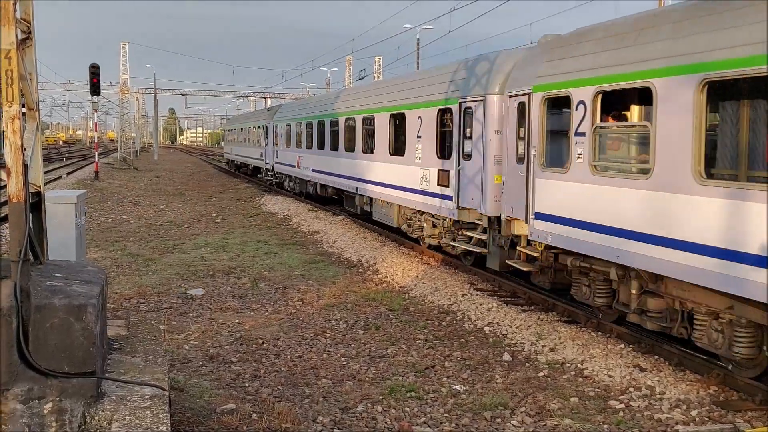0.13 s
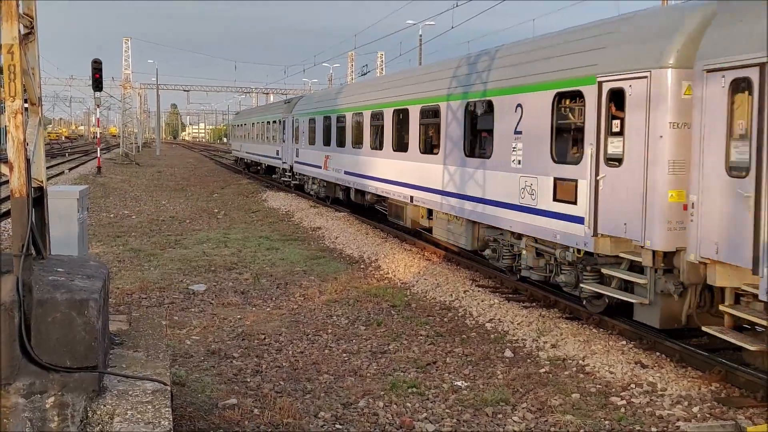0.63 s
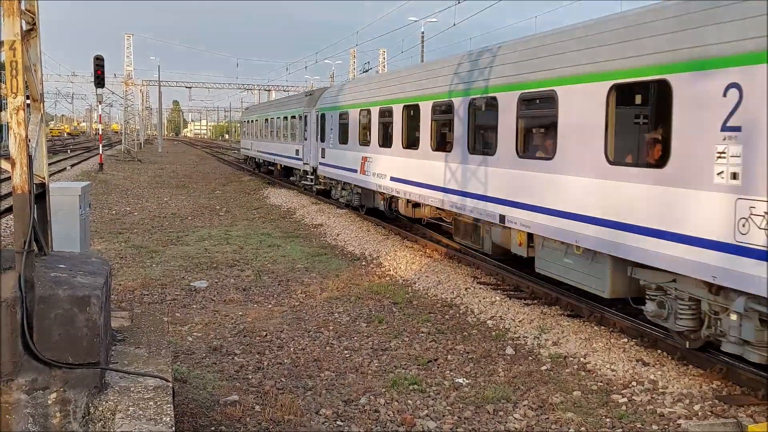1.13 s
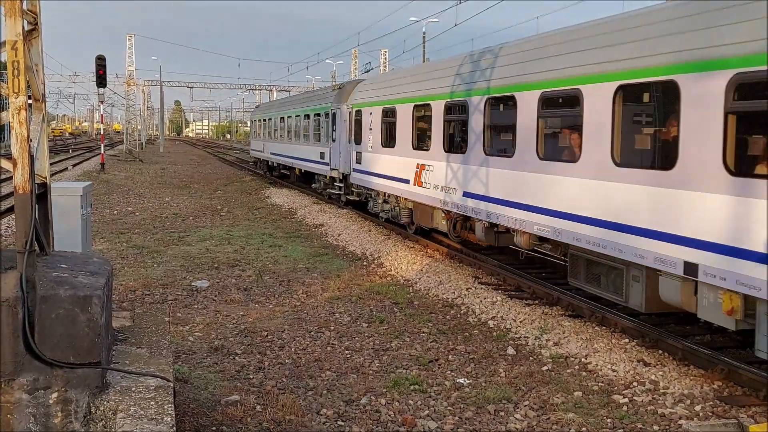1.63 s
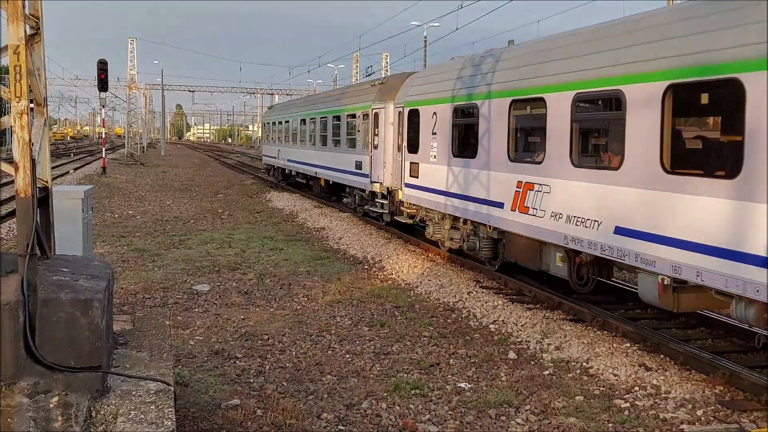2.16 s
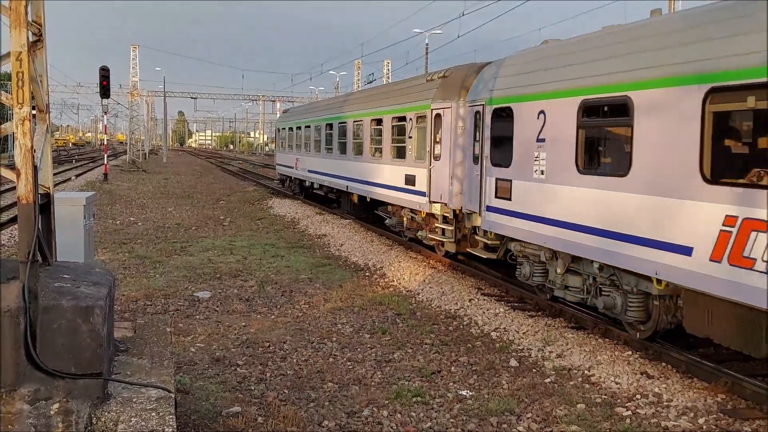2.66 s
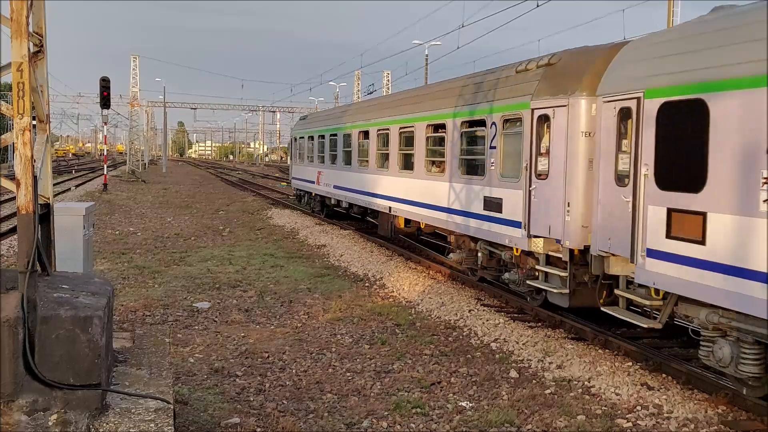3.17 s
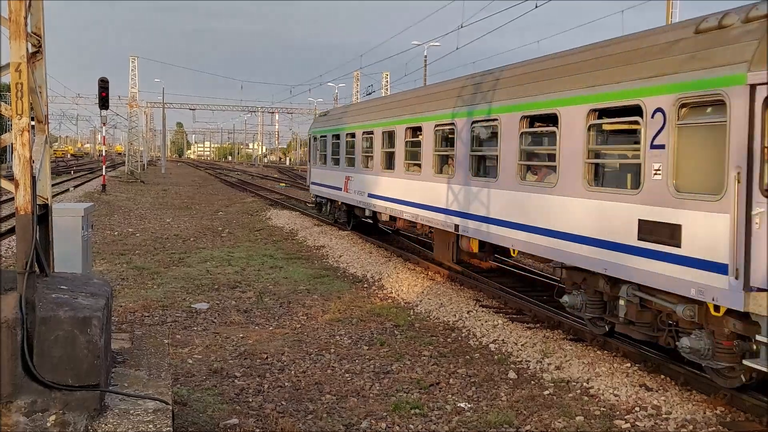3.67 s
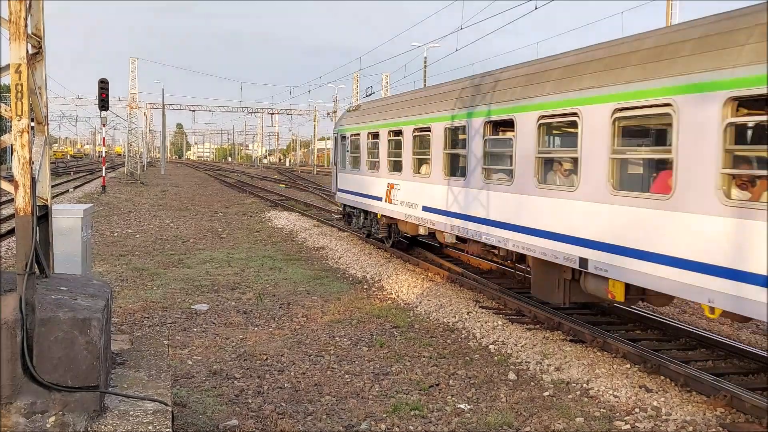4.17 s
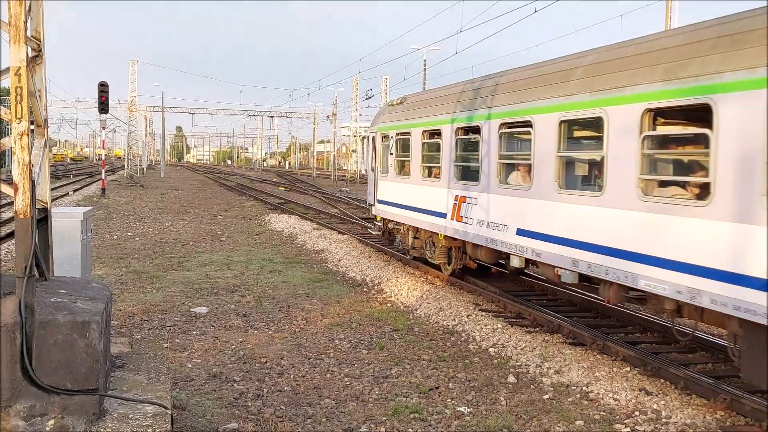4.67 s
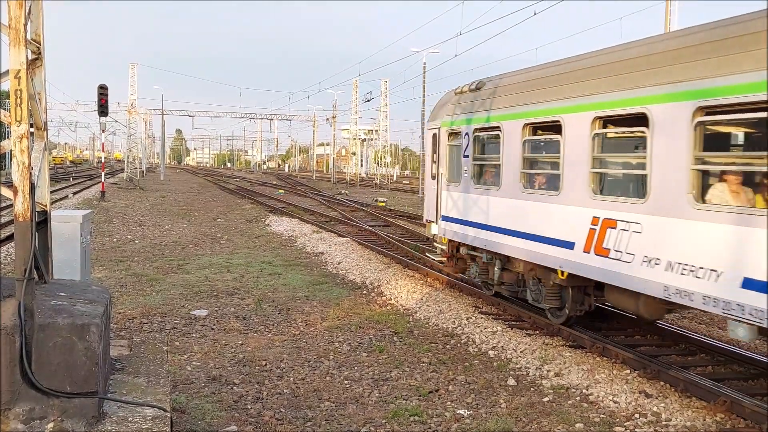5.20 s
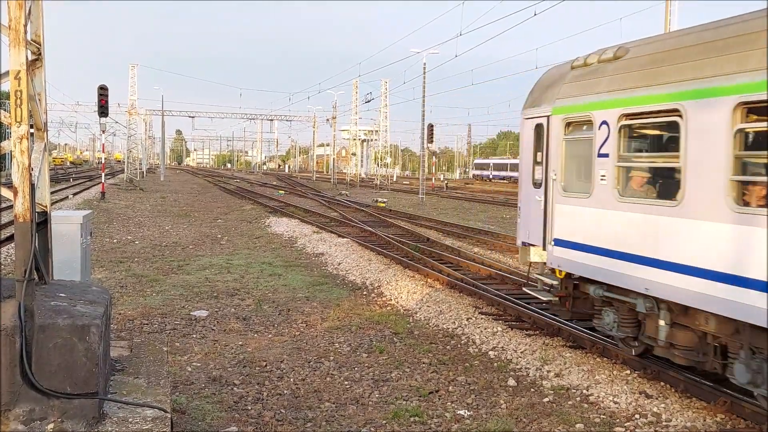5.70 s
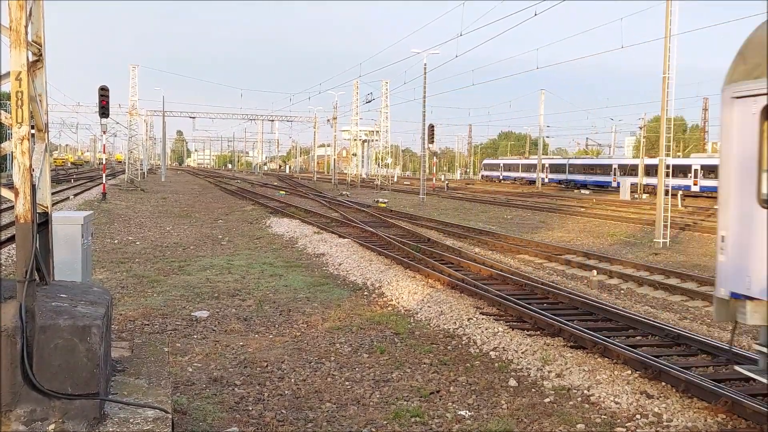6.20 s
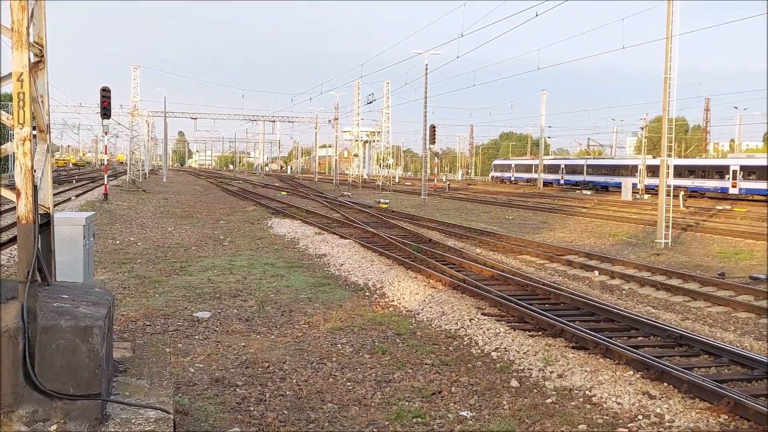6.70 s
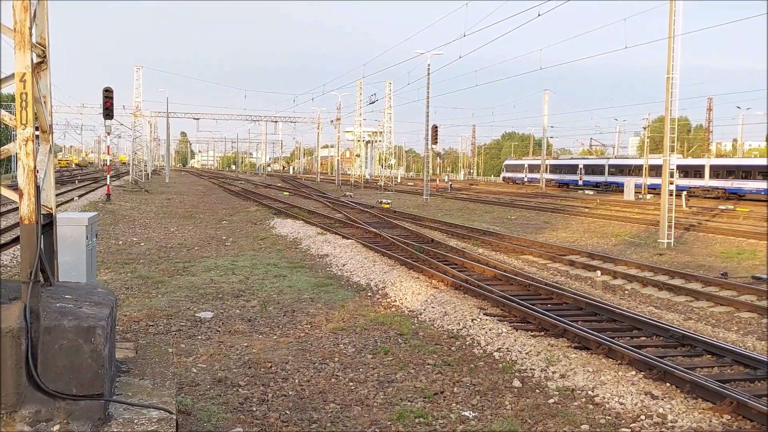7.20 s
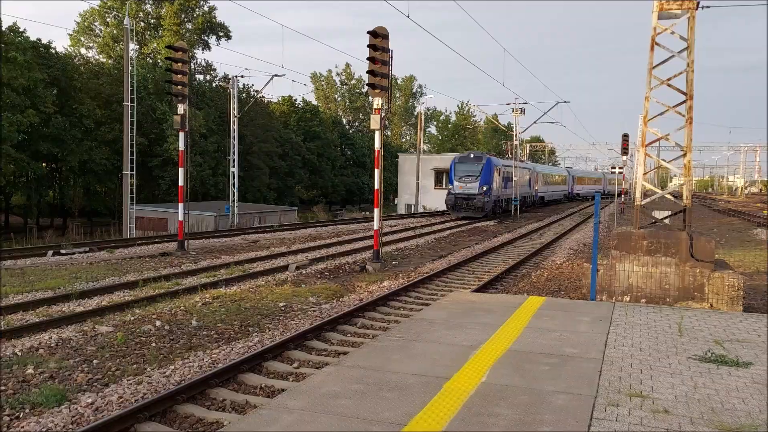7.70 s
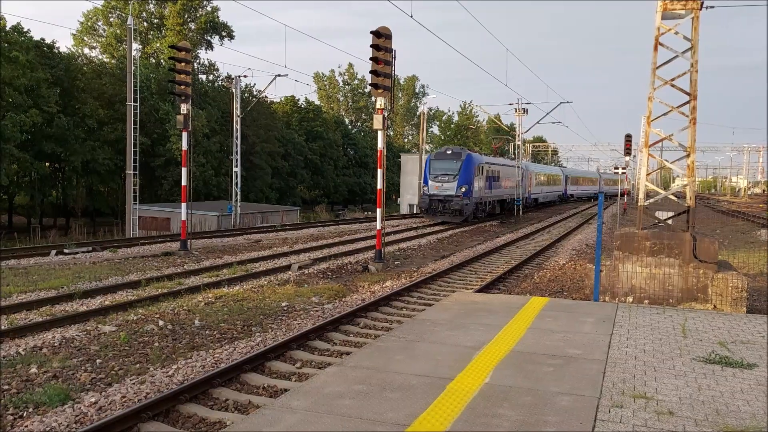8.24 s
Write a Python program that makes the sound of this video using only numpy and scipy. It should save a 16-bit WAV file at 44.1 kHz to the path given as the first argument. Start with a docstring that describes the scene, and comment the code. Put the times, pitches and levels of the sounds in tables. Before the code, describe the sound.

A close stereo pickup beside the rails catches the end of a passing train: steady rolling rumble, hiss and steel scraping, broken by irregular groups of heavy thuds and noisy clanks. A short crackle of brake air and a very high faint whine pass by. The final wheels knock past, the clatter recedes, and sound cuts out briefly. Then comes a quiet open yard with far train noise, low wind puffs and a soft double bump.

```python
"""Beside a jointed railway, then a quieter yard: a passenger train rolls past close by on the right.
Shaped noise makes the rumble, rail roar, hiss and scrape; decaying sines ring the wheels and rail ends.
Blows of axles over joints and loose rattles mix a low thud and a noisy clank; short tones knock, groan and squeak.
One spit of brake air crackles, and a thin wavering sine whines from under a coach.
After a short silence comes far train noise, with low wind puffs mostly on the left microphone port."""
import sys
import numpy as np
from scipy import signal
from scipy.fft import rfft, irfft
from scipy.io import wavfile
from scipy.ndimage import uniform_filter1d

SR = 44100
rng = np.random.default_rng(int(sys.argv[2]) if len(sys.argv) > 2 else 0)


def field_ratio(decibels):
    """Amplitude ratio for a level in dB (20 dB per decade); scalars and array-likes work."""
    return 10 ** (np.asarray(decibels, dtype=float) / 20)


def unload_wav(signal):
    """Save mono or channel-first audio to the path in sys.argv[1] as 16-bit WAV at rate SR, clipped to [-1, 1]."""
    wavfile.write(
        sys.argv[1],
        SR,
        np.round(np.clip(np.atleast_2d(signal).T, -1, 1) * 32767).astype(np.int16),
    )


N = 368216  # length in samples

# Rolling layers, rumble to fizz: low_hz, high_hz
ROLL_BANDS = [(40, 150), (150, 450), (450, 1100), (1100, 2500), (2500, 10000), (10000, 16000)]
# Spectral shape of rolling noise and clanks: pitch_hz, density_db
ROLL_COLOUR = [(19, -33.5), (32, -8), (65, 0.5), (299, -4), (388, -9.5), (504, -10.5), (1160, -17.5),
               (1390, -19.5), (2050, -22.5), (2500, -25.5), (3450, -26), (6300, -35.5), (7530, -32),
               (8570, -34), (13300, -42), (16000, -51)]
# Broad rail and microphone resonances: pitch_hz, width_hz, lift_db
RESONANCES = [(274, 46, 1.5), (710, 76, 1.5), (1340, 49, 7), (1900, 115, 1.5), (3450, 330, 3),
              (7330, 310, 1.5)]
# How each rolling layer follows the controls: level_db, nearness_share, boom_share, drumming_db
LAYERS = [(-39, 0.29, -0.13, 3.5), (-33.5, 0.27, 0.69, -1.5), (-40, 0.67, 0.63, 1.05),
          (-41, 0.33, 0.078, 1), (-46, 0.86, 0.45, 0.85), (-66, 1, 0.56, 0)]
# Nearness of the running gear: time_s, nearness_db (read relative to NEAR_MEAN_DB)
NEARNESS = [(0.0, -55), (0.16, -50), (0.41, -40), (0.53, -43.5), (0.73, -46), (0.92, -42.5), (1.28, -41.5),
            (2.02, -46.5), (2.12, -44), (2.41, -49), (2.7, -48.5), (2.9, -49), (3.23, -40), (4.0, -42),
            (4.39, -43), (5.22, -49.5), (5.41, -51), (5.68, -48.5), (5.78, -42), (5.92, -42), (6.08, -37),
            (6.35, -43), (6.82, -50), (6.96, -55.5), (7.33, -55)]
NEAR_MEAN_DB = -46
# Bogies running up to the nearest joint, booming loose sleepers: time_s, boom_db
BOGIES = [(.1, 6), (.68, 7.5), (1.46, 5), (1.95, 4.5), (3.15, 5), (3.42, 5), (4.15, 5), (4.6, 0.5),
          (6.09, 2.5), (6.42, 0), (6.8, 0.5), (7.45, -2.5)]
BOOM_RISE_S, BOOM_FALL_S = 0.27, 0.06
# One coach passes in COACH_S; its floor drums when the middle is abreast
COACH_S, COACH_MIDDLE_S = 2.67, 2.89
# Air leaking under a coach: time_s, lift_db over the fizz, half_length_s
LEAK = (5.42, 7.9, 0.56)
# Likeness of the two microphone ports for the near train: pitch_hz, likeness (0 to 1)
TRAIN_LIKENESS = [(40, 0.45), (80, 0.59), (150, 1), (300, 0.91), (700, 0.95), (1400, 0.37), (3000, 0.031),
                  (8000, 0.12), (14000, 0.12)]
# Sensitivity of the ports: pitch_hz, left_minus_right_db
PORT_TILT = [(60, -1.5), (180, 0.5), (550, 1), (1650, 2), (4970, 1.0), (15000, 0.5)]
LEFT_LEAD_S = -2.75e-4  # negative: the train is on the right, so the left port hears it late
# Ringing modes of a wheel: pitch_hz, level_db, t60_s
WHEEL_MODES = [(2145, -20, 0.072), (3400, -17, 0.12), (3740, -28.5, 0.064), (3950, -20, 0.1),
               (6642, -31, 0.12), (7706, -29, 0.18), (9060, -32, 0.13), (9688, -29.5, 0.16)]
# Rail-end ring after the thud: pitch_hz, level_db against the thud, t60_s
RAIL_END = [(299, -14, 0.29), (407, -7.5, 0.058), (716, -13.5, 0.016)]
# Bands where tread and rail scrape: pitch_hz, width_hz, level_db, nearness_share, burst_db
SCRAPES = [(354, 150, -43.5, 0.99, 2.5), (624, 340, -45.5, 0.5, 2.5), (1490, 70, -50, 0.77, 3.5),
           (2025, 140, -49.5, 0.15, 2.5), (3430, 270, -56, 1.6, 3), (3940, 620, -59.5, 1.5, 5),
           (7170, 320, -64.5, 0.69, 6), (7860, 250, -68.5, 0.98, 6)]
# Blows of the passing train (axles over joints, loose rattles with hardly a thud, a treble swell at 6.805 s):
# time_s, clank_db, thud_db (both before trim), dullness_db (far: more knock, less fizz)
BLOWS = [(0.1192, -30, -30, 3), (0.227, -29, -35, 5), (0.4, -25.5, -37, 5), (0.5296, -26, -32, -1.5),
         (0.624, -43, -10, -1.5), (0.6519, -22.5, -6.5, -5.5), (0.9306, -22.5, -9, -1),
         (1.183, -30.5, -25, -1), (1.3586, -31, -21, -5), (1.4716, -24.5, -6.5, -4.5),
         (1.751, -22.5, -11, 0.7), (2.036, -23, -30, 6), (2.3306, -28.5, -30, 6), (2.867, -25.5, -22, 5),
         (2.9785, -30.5, -44, 0.5), (3.0919, -25, -42, 2.5), (3.373, -45, -9, 12.5),
         (3.406, -29, -7.5, -1.5), (3.6886, -26, -7.5, -2.5), (3.815, -29, -61.5, -3),
         (4.1007, -27.5, -21, 2.5), (4.2281, -25.5, -5.5, -3.5), (4.51, -23.5, -8.5, -2),
         (4.577, -26, -28, -2.5), (4.796, -22, -17, 5), (5.089, -29, -25, 3.5), (5.7439, -29, -49, -6.5),
         (6.018, -36, -26, 1), (6.152, -42, -13, 12), (6.171, -24.5, -7, -1), (6.4545, -23, -8.5, -2),
         (6.805, -41.5, -38, -5), (7.148, -38, -50, 0), (7.239, -40, -47, 0), (7.4203, -37, -27, 4.5)]
THUD_HZ = 361  # before each blow's random detune
THUD_LEAD_S, THUD_RISE_S, THUD_FALL_S = .0005, .0042, .002  # swells, then stops short
CLANK_T60_S = 0.3  # before the shortening with pitch
KNOCK_SHARE, FIZZ_SHARE = 0.9, 0.65  # how far dullness lifts the knock and lowers the fizz
CLANK_RISE_S, SOFTEN_PER_DB = 0.0049, 0.23  # duller, farther clanks rise more slowly
CRACK, CRACK_S = 0.45, 0.0074  # extra strength of a clank's first instant, and how fast it goes
# Low groans of track and underframe, and short low wind gusts at 7.11 and 8.19 s:
# time_s, peak_db, pitch_hz, half_length_s
GROANS_AND_GUSTS = [(.12, -14, 186, 0.0053), (0.357, -26, 706, 0.014), (.41, -18.5, 190, 0.017),
                    (.7, -20.5, 163, 0.0087), (2.088, -28, 90, 0.022), (2.35, -24.5, 198, 0.026),
                    (3.11, -30, 612, 0.027), (3.16, -19, 198, 0.012), (4.805, -31, 700, 0.022),
                    (5.1, -19.5, 188, 0.0079), (5.783, -21, 119, 0.0093), (5.92, -28, 820, 0.027),
                    (7.11, -29, 74.6, 0.037), (8.19, -27, 67.6, 0.019)]
# Tread striking the far rail end: time_s, level_db before trim, pitch_hz
KNOCKS = [(0.524, -26, 781), (0.929, -22, 596), (1.75, -28, 530), (2.039, -21, 785), (2.332, -25, 600),
          (2.871, -18, 565), (3.15, -22, 775), (3.687, -24, 598), (4.508, -26, 608), (4.795, -21, 716),
          (5.091, -23, 720), (5.923, -19, 830), (6.452, -22, 500), (7.226, -28, 538), (7.429, -38, 726)]
KNOCK_PEAK_S, KNOCK_RISE_S, KNOCK_FALL_S = .0021, 0.00079, 0.0033
# Short squeaks, and a faint very high puff at 5.39 s: time_s, pitch_hz, level_db, length_s
SQUEAKS = [(0.673, 7900, -53, .03), (5.378, 7800, -48, 0.1), (5.4, 2540, -50, 0.056),
           (0.949, 3480, -38, 0.022), (1.05, 3930, -38, 0.018), (2.089, 1340, -35, 0.035),
           (3.713, 3450, -33.5, 0.02), (5.355, 2500, -44, .025), (1.777, 3450, -42, .02),
           (3.065, 2230, -45, 0.023), (6.308, 1400, -39, 0.017), (6.457, 3430, -31, 0.018),
           (6.519, 3600, -48.5, .08), (6.72, 1550, -48, .06), (6.71, 4650, -50, .03),
           (7.149, 4500, -45, 0.01), (7.153, 3970, -47.5, 0.022), (5.39, 15100, -51, .06),
           (7.838, 7600, -54, .015), (7.965, 7640, -55, .015), (8.075, 7700, -57, 0.02),
           (8.288, 2400, -53, 0.026), (8.299, 4760, -56, .015)]
# Whine as its coach passes: time_s, level_db before the waver
WHINE = [(1.501, -74), (2.2, -66), (2.7, -55), (3.3, -63), (3.5, -70), (3.749, -67), (4.3, -72),
         (5.401, -75), (5.6, -84)]
WHINE_HZ, WHINE_ABREAST_S, WHINE_M, SPEED_M_S = 13540, 3.75, 5, 8.8
SOUND_M_S = 343
# Puffs of brake air: start_s, level_db, length_s
SPITS = [(2.514, -56, .002), (2.523, -40, 0.0035), (2.543, -30.5, 0.017), (2.615, -47, 0.0067)]
# Spectral shape of brake air: pitch_hz, density_db
SPIT_COLOUR = [(1760, -34.5), (3000, -30.5), (3700, -14), (4260, -14.5), (8580, -12.5), (12700, -4),
               (14400, -2), (16000, -33.5)]
# Gap between the two scenes: start_s, end_s
SILENCE = (7.516, 7.700)
CUT_OUT_S, CUT_IN_S = 0.001, 0.00036
# Spectral shape of the yard before its bass and treble trim: pitch_hz, density_db
YARD_COLOUR = [(15, -62), (25, -22.5), (74, -3.5), (175, -24.5), (309, -13.5), (463, -33), (695, -22.5),
               (1100, -35.5), (2350, -32), (3800, -37.5), (5500, -47.5), (7500, -43), (8590, -51.5),
               (16000, -66)]
# Likeness of the ports in the yard: pitch_hz, likeness (-1 to 1)
YARD_LIKENESS = [(60, 0.24), (240, 1), (950, 0.44), (3770, -0.23), (15000, -0.032)]
# Wind puffs: time_s, level_db, left_minus_right_db
WIND = [(7.7, -23.5, 8), (7.726, -29, 10), (7.935, -31.5, 16.5), (7.96, -39.5, 1), (8.15, -61, -19),
        (8.18, -31.5, 0), (8.23, -59, 8), (8.3, -40, 1), (8.35, -47, -2)]
# Spectral shape of the wind: pitch_hz, density_db
WIND_COLOUR = [(25, -19), (60, 6.5), (150, -0.5), (300, -8.5), (500, -21.5), (900, -35), (2000, -92)]
# Double knock at the left port: start_s, level_db before trim, pitch_hz
BUMPS = [(7.794, -16.5, 342), (7.801, -22, 348)]


def evened(x):
    """Scales a signal to unit rms."""
    return x / np.sqrt(np.mean(x ** 2) + 1e-20)


def read(points, hz):
    """Reads a pitch_hz, value table on a log-frequency axis."""
    f, value = np.transpose(points)
    return np.interp(np.log(hz + 1), np.log(f + 1), value)


def add(mix, s, sound):
    """Mixes a sound in at s seconds."""
    part = mix[..., round(s * SR):][..., :sound.shape[-1]]
    part += sound[..., :part.shape[-1]]


def bins_and_times(size, count=N):
    """Bin frequencies and frame times of a spectrogram."""
    return np.fft.rfftfreq(size, 1 / SR), np.arange(count * 4 // size + 5) * size / 4 / SR


def patches(shape, bins, frames):
    """Random blotches over frequency and time, unit rms."""
    field = rng.standard_normal(shape[::-1]).T
    return evened(uniform_filter1d(uniform_filter1d(field, bins, 0), frames, 1))


def lead(hz):
    """Phase lead of the left port."""
    return 2 * np.pi * hz * LEFT_LEAD_S


def pair(db, likeness, phase_lead, size):
    """Two-port noise from a bins x frames dB field; the right port shares part of the left's noise."""
    a, b, c, d = rng.standard_normal((db.shape[1], db.shape[0], 4)).T
    likeness = np.clip(likeness, -1, 1)[:, None]
    left = a + 1j * b
    shared = likeness * left * np.exp(-1j * phase_lead)[:, None]
    right = shared + np.sqrt(1 - likeness ** 2) * (c + 1j * d)
    return signal.istft(np.array([left, right]) * field_ratio(db), nperseg=size, noverlap=size * 3 // 4)[1]


def tilted(x):
    """The ports differ a little in sensitivity across the spectrum."""
    half = read(PORT_TILT, np.fft.rfftfreq(x.shape[1], 1 / SR)) / 2
    return irfft(rfft(x) * field_ratio(np.array([half, -half])), x.shape[1])


def resonance_db(hz):
    """Lift of the spectrum by the rail and microphone resonances."""
    return sum(db / (1 + (2 * (hz - f) / width) ** 2) for f, width, db in RESONANCES)


def nearness_db(t):
    """Nearness of the running gear relative to its mean."""
    return np.interp(t, *np.transpose(NEARNESS)) - NEAR_MEAN_DB


def boom_db(t):
    """Each bogie swells slowly up to the joint and lets go quickly."""
    return sum(db * np.exp(-((t - s) / np.where(t < s, BOOM_RISE_S, BOOM_FALL_S)) ** 2) for s, db in BOGIES)


def layer_db(t):
    """Level of each rolling layer (rumble, sleepers, rail, roar, hiss, fizz) at times t."""
    near, boom = nearness_db(t), boom_db(t)
    drum = np.cos(2 * np.pi * (t - COACH_MIDDLE_S) / COACH_S)
    levels = np.array([db + a * near + b * boom + c * drum for db, a, b, c in LAYERS])
    leak_s, leak_db, half_s = LEAK
    levels[-1] += leak_db * np.exp(-((t - leak_s) / half_s) ** 2)
    return levels


def layer_gain(index):
    """Gain of one rolling layer at every sample."""
    t = bins_and_times(1024)[1]
    return np.interp(np.arange(N) / SR, t, field_ratio(layer_db(t)[index]))


def rolling(patchy_db=1.5, judder_db=0.83, drone_db=0.5, lump_db=1.5):
    """Rough wheels on rough rail: noise through the resonances, each band swelling as bogies pass."""
    hz, t = bins_and_times(1024)
    resonance = resonance_db(hz)
    colour = read(ROLL_COLOUR, hz) + resonance
    levels = layer_db(t)
    # bring every band to the level of its layer, then cross-fade between band centres
    offset = [level - 10 * np.log10(np.sum(field_ratio(2 * colour[(hz >= lo) & (hz < hi)])))
              for level, (lo, hi) in zip(levels, ROLL_BANDS)]
    centres = [np.sqrt(lo * hi) for lo, hi in ROLL_BANDS]
    share = np.array([read(list(zip(centres, row)), hz) for row in np.eye(len(centres))])
    db = colour[:, None] + share.T @ np.array(offset)
    patchiness = read([(300, 0.71), (5000, 1.0), (15000, 2.3)], hz)[:, None]
    db += patchy_db * patches(db.shape, 12, 8) * patchiness
    # narrow rail resonances come and go as wheels move along
    db += drone_db * patches(db.shape, 3, 20)
    # rolling surges in the sleepers
    lumpiness = read([(120, 0.17), (250, 0.88), (800, 0.92), (1500, 0.3)], hz)[:, None]
    db += lump_db * patches(db.shape, 6, 14) * lumpiness
    # resonances flare with the hiss layer, when a bogie is near
    db += np.outer(resonance, 0.085 * (levels[4] + 36.5))
    # loose parts shake wide bands together
    db += judder_db * patches(db.shape, 300, 3)
    return field_ratio(3.5) * pair(db, read(TRAIN_LIKENESS, hz), lead(hz), size=1024)[:, :N]


def ring(strikes, count):
    """Strikes ring the wheel modes; each mode takes its own random share of every strike."""
    t = np.arange(count) / SR
    out = np.zeros((2, len(strikes)))
    for hz, db, t60 in WHEEL_MODES:
        tone = field_ratio(db - 60 * t / t60) * np.sin(2 * np.pi * hz * t) * np.minimum(t / 0.0033, 1)
        rough = strikes * rng.standard_normal(out.shape)
        out += signal.oaconvolve(rough, tone[None], axes=1)[:, :len(strikes)]
    return out


def singing(ring_db=-13, nicks_per_s=120):
    """Small nicks in the rail ring the wheels, standing out while a bogie is near."""
    strength = field_ratio(4.3 * np.minimum(rng.exponential(1, N), 3))
    nicks = (rng.random(N) < nicks_per_s / SR) * strength
    near = layer_gain(index=4)  # follows the hiss
    return evened(ring(nicks, count=SR // 4)) * near * evened(near) * field_ratio(ring_db)


def clatter(clatter_db=-7, knocks_per_s=60):
    """Loose gear and uneven rail give small random knocks that ring the rail, in step with its roar."""
    t = np.arange(SR // 8) / SR
    strength = field_ratio(1.9 * np.minimum(rng.exponential(1, N), 3))
    hits = (rng.random((len(RAIL_END), N)) < knocks_per_s / SR) * strength  # knocks_per_s for each mode
    tones = [field_ratio(-60 * t / t60) * np.sin(2 * np.pi * hz * t) * np.minimum(t / 0.0031, 1)
             for hz, _, t60 in RAIL_END]
    rung = signal.oaconvolve(hits, np.array(tones), axes=1)[:, :N].sum(0)
    return evened(rung) * layer_gain(index=2) * field_ratio(clatter_db)


def scrape(boom_share=0.73, boom_top_hz=1000):
    """Narrow noise bands flare in uneven bursts with the running gear; low ones swell with the boom."""
    hz, t = bins_and_times(512)
    near, boom = nearness_db(t), boom_share * boom_db(t)
    bursts = evened(uniform_filter1d(rng.standard_normal((len(SCRAPES), len(t))), size=10))
    power = 1e-12
    for (f, width, db, share, burst_db), burst in zip(SCRAPES, bursts):
        band = 1 / (1 + (2 * (hz - f) / width) ** 2) ** 2
        level = db + share * near + burst_db * burst + (f < boom_top_hz) * boom
        power = power + np.outer(band / band.sum(), field_ratio(2 * level))
    return pair(10 * np.log10(power), read(TRAIN_LIKENESS, hz), lead(hz), size=512)[:, :N]


def thud_sound(t, detune):
    """A thud of two or three cycles that rings on at the rail-end pitches."""
    u = t - .012
    swell = np.exp(-(u / np.where(u < 0, THUD_RISE_S, THUD_FALL_S)) ** 2)
    thud = swell * np.cos(2 * np.pi * THUD_HZ * detune * u)
    tail = sum(field_ratio(db - 60 * u / t60) * np.sin(2 * np.pi * f * detune * u) for f, db, t60 in RAIL_END)
    return thud + (u > 0) * tail


def clank_sound(t, dull_db):
    """Running gear clanks: decaying coloured noise with a stronger first instant."""
    hz, frame_t = bins_and_times(256, count=SR // 4)
    colour = read(ROLL_COLOUR, hz) + 1.95 * resonance_db(hz)
    colour += read([(200, -12), (600, -5), (1200, KNOCK_SHARE * dull_db - 5.5), (2800, -4.5),
                    (5000, 0.0), (9000, -FIZZ_SHARE * dull_db - 5.0)], hz)
    colour -= 10 * np.log10(np.sum(field_ratio(2 * colour[hz > 2500])))
    t60 = CLANK_T60_S * read([(300, 0.86), (3400, 0.99), (12000, 0.86)], hz)
    # parts rattle unevenly, each blow differently
    ragged = patches((len(hz), len(frame_t)), 5, 8)
    db = colour[:, None] + ragged - 60 * frame_t / t60[:, None]
    clank = pair(db, read(TRAIN_LIKENESS, hz), lead(hz), size=256)
    rise = 1 - np.exp(-t / (CLANK_RISE_S * np.exp(SOFTEN_PER_DB * dull_db)))
    return clank[:, :len(t)] * rise * (1 + CRACK * np.exp(-t / CRACK_S))


def blows(thud_trim_db=-3, clank_trim_db=-5, ring_db=-22):
    """Blows of the passing train: each mixes thud, clank and wheel ring by its own levels."""
    out, thuds, strikes = np.zeros((2, N)), np.zeros(N), np.zeros(N)
    t = np.arange(SR // 4) / SR
    detunes = rng.uniform(0.99, 1.04, len(BLOWS))
    for (s, clank_db, thud_db, dull_db), detune in zip(BLOWS, detunes):
        add(thuds, s - THUD_LEAD_S - .012, field_ratio(thud_db + thud_trim_db) * thud_sound(t, detune))
        add(strikes, s, field_ratio(clank_db + ring_db) * np.hanning(300))
        add(out, s - .0025, field_ratio(clank_db + clank_trim_db) * clank_sound(t, dull_db))
    late = irfft(rfft(thuds) * np.exp(1j * lead(np.fft.rfftfreq(N, 1 / SR))), N)  # left port
    return out + [late, thuds] + ring(strikes, count=SR // 4)


def groans_and_gusts():
    """Low groans and short wind gusts: a few cycles that swell and fade, right port first."""
    out = np.zeros((2, N))
    u = np.arange(-SR // 10, SR // 10) / SR
    for (s, db, hz, half_s), turn in zip(GROANS_AND_GUSTS, rng.random(len(GROANS_AND_GUSTS))):
        phase = 2 * np.pi * (hz * u + turn) + np.array([[lead(hz)], [0]])
        add(out, s + u[0], field_ratio(db) * np.exp(-(u / half_s) ** 2) * np.sin(phase))
    return out


def knocks(trim_db=1):
    """A cycle or two of hard steel contact, reaching the right port first."""
    out = np.zeros((2, N))
    u = np.arange(-200, 800) / SR
    for s, db, hz in KNOCKS:
        v = u + np.array([[LEFT_LEAD_S], [0]]) - KNOCK_PEAK_S
        shape = np.exp(-np.where(v < 0, (v / KNOCK_RISE_S) ** 2, v / KNOCK_FALL_S))
        add(out, s + u[0], field_ratio(db + trim_db) * shape * np.cos(2 * np.pi * hz * v))
    return out


def squeaks():
    """Brief fuzzy whistles that swell fast and trail off; higher ones wander more in phase."""
    out = np.zeros((2, N))
    fuzz = uniform_filter1d(rng.standard_normal((len(SQUEAKS), 2, 2, 16000)), 300)
    t = np.arange(16000) / SR
    for (s, hz, db, length), (flutter, wander) in zip(SQUEAKS, fuzz):
        whistle = (1 + 12 * flutter) * np.sin(2 * np.pi * hz * t + hz / 300 * wander)
        swell = np.e * 2 * t / length * np.exp(-2 * t / length)  # peaks at half the length
        add(out, s - .005, field_ratio(db) * whistle * swell)
    return out


def whine():
    """A fuzzy tone from equipment under one coach wavers in level and falls in pitch by the Doppler law."""
    t = np.arange(N) / SR
    along_m = SPEED_M_S * (t - WHINE_ABREAST_S)
    hz = WHINE_HZ * (1 - SPEED_M_S / SOUND_M_S * along_m / np.hypot(along_m, WHINE_M))
    fuzz_hz = 32 * evened(uniform_filter1d(rng.standard_normal(N), 400))
    turns = np.cumsum(hz + fuzz_hz) / SR
    waver = field_ratio(6.6 * evened(uniform_filter1d(rng.standard_normal((2, N)), 1500)))
    return waver * np.sin(2 * np.pi * turns) * field_ratio(np.interp(t, *np.transpose(WHINE), -140, -140))


def brake_air():
    """Escaping air: crackling bursts of bright hiss with a short tail."""
    t, gate = np.arange(N) / SR, np.zeros(N)
    for s, db, length in SPITS:
        tail = 0.53 * np.exp(-np.maximum(t - s - length, 0) / length)
        gate += field_ratio(db) * (t > s) * np.where(t < s + length, 1, tail)
    hz, frame_t = bins_and_times(256)
    colour = read(SPIT_COLOUR, hz)[:, None] + 0 * frame_t
    hiss = pair(colour, read(TRAIN_LIKENESS, hz), lead(hz), size=256)[:, :N]
    crackle = field_ratio(3.0 * evened(uniform_filter1d(rng.standard_normal(N), 30)))
    return evened(hiss * crackle) * gate


def yard(gain_db=-48):
    """Smooth far noise of the second train and the surroundings."""
    hz, t = bins_and_times(1024)
    db = read(YARD_COLOUR, hz)[:, None] + 1.8 * patches((len(hz), len(t)), 20, 8)
    db -= 10 * np.log10(np.sum(field_ratio(2 * read(YARD_COLOUR, hz[hz > 400]))))
    db += read([(150, -0.5), (400, 5.0)], hz)[:, None]  # bass and treble trim
    return field_ratio(gain_db) * pair(db, read(YARD_LIKENESS, hz), 0 * hz, size=1024)[:, :N]


def wind(bump_trim_db=6):
    """Lumpy low puffs, only loosely alike at the two ports, and a double knock on the left."""
    hz, frame_t = bins_and_times(1024)
    colour = read(WIND_COLOUR, hz)[:, None] + 0 * frame_t
    puffs = evened(pair(colour, 0.37 + 0 * hz, 0 * hz, size=1024)[:, :N])
    s, db, pan_db = np.transpose(WIND)
    t = np.arange(N) / SR
    level, pan = np.interp(t, s, db), np.interp(t, s, pan_db) / 2
    out = puffs * field_ratio(np.array([level + pan, level - pan]))
    u = np.arange(1500) / SR
    for s, db, hz in BUMPS:
        bump = np.sin(2 * np.pi * hz * u) * np.exp(-((u - .003) / 0.0025) ** 2)
        add(out[0], s, field_ratio(db + bump_trim_db) * bump)
    return out


def edit():
    """Gain of the cut to silence between the two scenes."""
    t = np.arange(N) / SR
    return np.clip((SILENCE[0] - t) / CUT_OUT_S, 0, 1) + np.clip((t - SILENCE[1]) / CUT_IN_S, 0, 1)


def scene():
    """The near train up to the silence, the yard after it; squeaks and low gusts in both."""
    near = tilted(rolling() + singing() + clatter() + blows() + knocks() + scrape() + brake_air() + whine())
    is_train = np.arange(N) / SR < np.mean(SILENCE)
    return np.where(is_train, near, yard() + wind()) + squeaks() + groans_and_gusts()


def band_limit(x):
    """A steep low-pass at the top of the band."""
    return signal.sosfilt(signal.butter(12, 15900, fs=SR, output="sos"), x)


def record(dry):
    """The microphone drops the deepest bass; the two scenes are cut together."""
    bass_cut = signal.butter(4, 40, "highpass", fs=SR, output="sos")
    mix = signal.sosfilt(bass_cut, dry) * edit()
    return band_limit(mix)


dry = scene()
out = record(dry)
unload_wav(out)
```